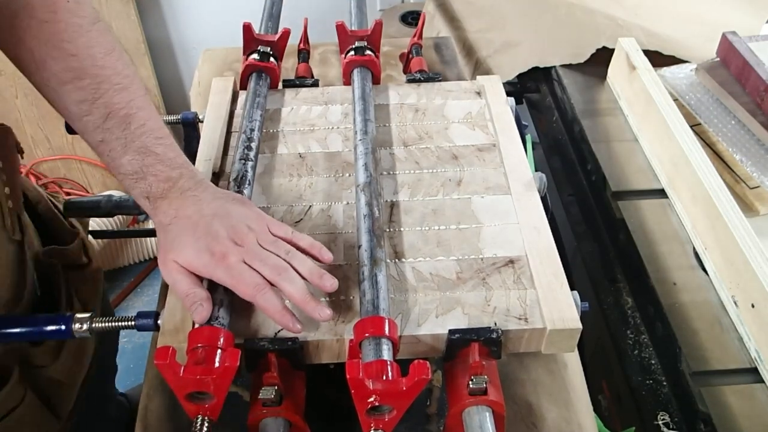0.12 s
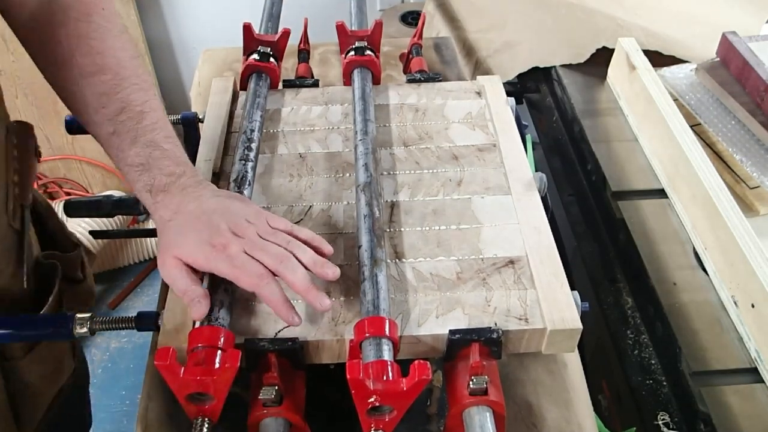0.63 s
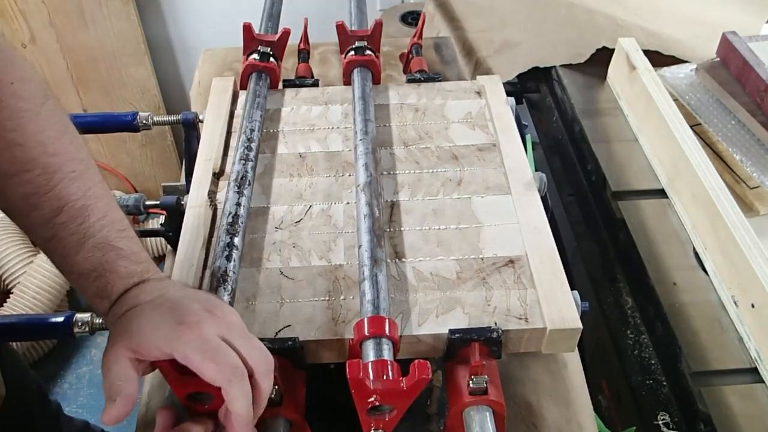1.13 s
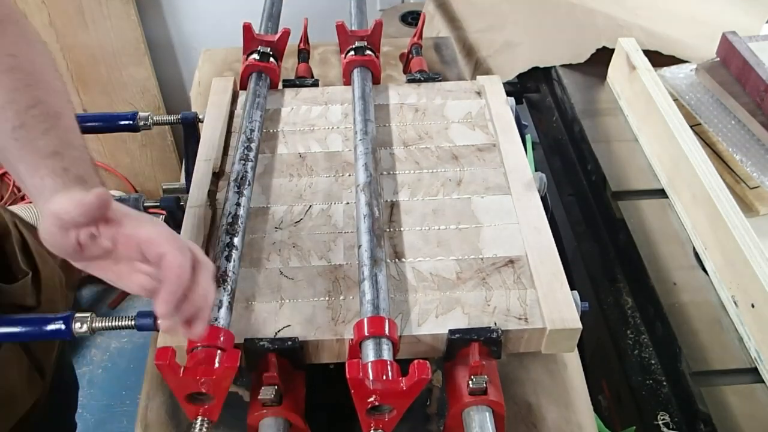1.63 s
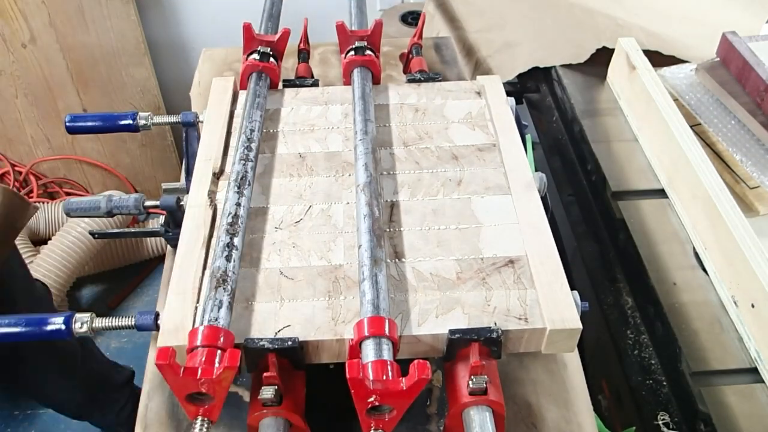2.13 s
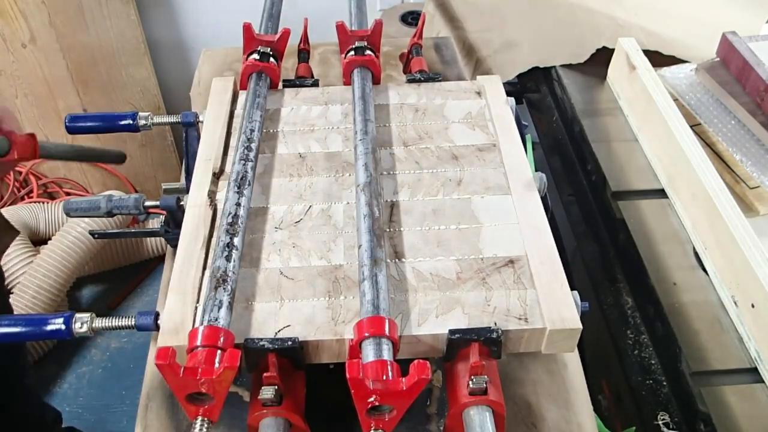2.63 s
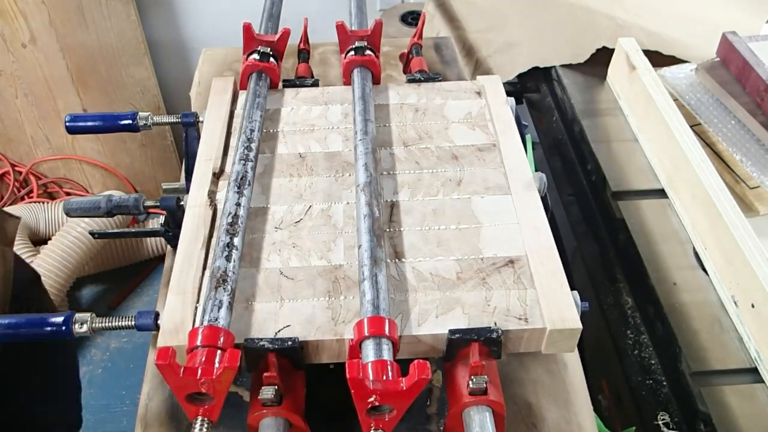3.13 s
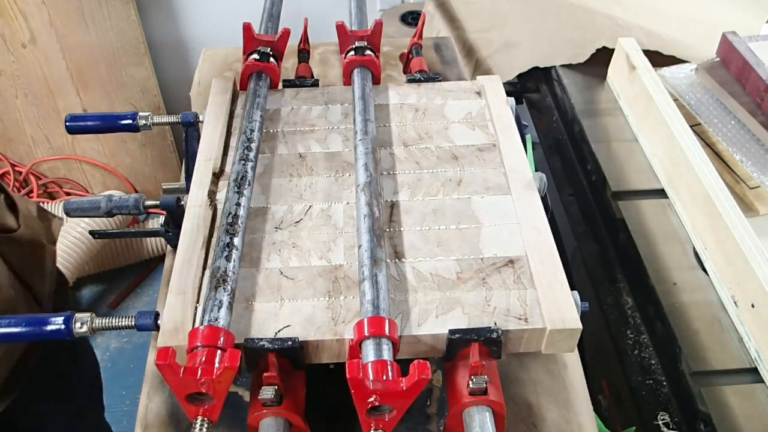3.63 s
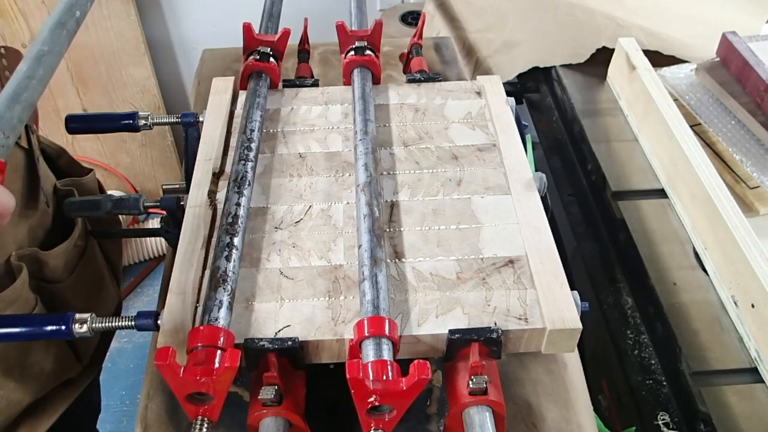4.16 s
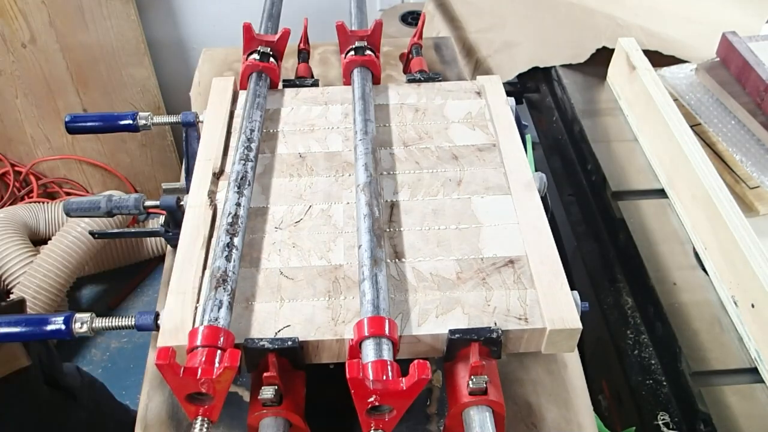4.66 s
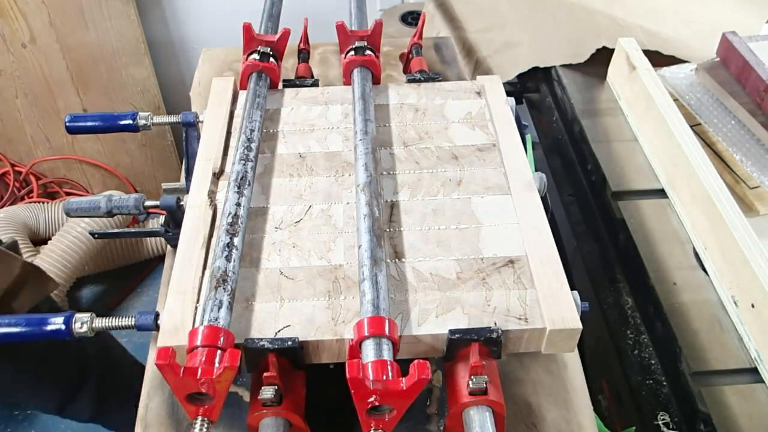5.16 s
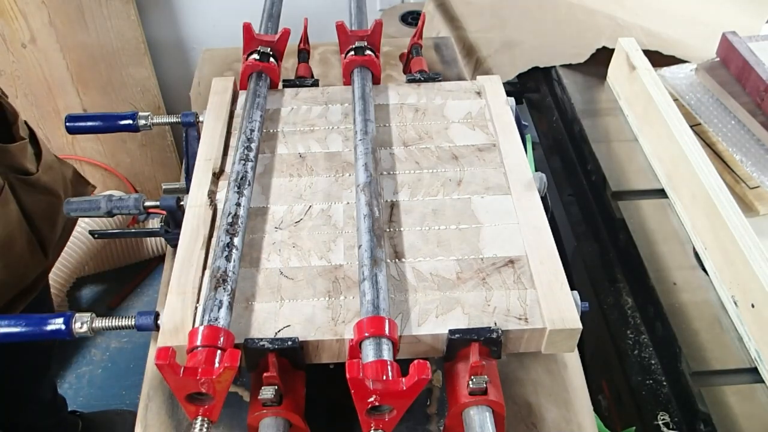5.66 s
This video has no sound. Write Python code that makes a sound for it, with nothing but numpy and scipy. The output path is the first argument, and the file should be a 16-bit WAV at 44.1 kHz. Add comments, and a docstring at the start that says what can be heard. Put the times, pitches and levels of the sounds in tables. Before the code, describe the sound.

Close stereo pickup in a quiet workshop: hands shift steel pipe clamps on a glued wooden panel, played fast. Light clanks, knocks and cloth or jaw scrapes begin, harder steel blows come past two and three seconds, then a dense clatter after four. One last hard clank near five leaves faint sliding over hiss tinged with a high whine.

```python
"""Hands tighten and shift steel pipe clamps on a wooden glue-up in a quiet workshop, played fast at its own pitch.
Light clanks, knocks and scrapes open it; harder blows follow past 2 s and 3.4 s, the densest from 4.2 to 4.8 s.
A last hard clank falls near 5.2 s, then sliding strokes fade over the room hiss. The speed-up blurs each blow into
a short burst, made of shaped noise and of modes whose phases differ left and right.
The microphone housing rings near 5 kHz and lends the hiss a high whine."""
import sys
import numpy as np
from scipy import signal
from scipy.fft import rfft, irfft, next_fast_len
from scipy.io import wavfile
from scipy.ndimage import uniform_filter1d

SR = 44100
rng = np.random.default_rng(int(sys.argv[2]) if len(sys.argv) > 2 else 0)


def gain_from_decibels(decibels):
    """Convert decibel values to linear amplitude factors."""
    exponent = np.asarray(decibels, float) / 20
    return 10 ** exponent


def digitize_waveform(pressure):
    """Quantize a signal to 16-bit integers and store it at the path in sys.argv[1].

    Rows of a 2-D input are taken as channels; values are limited to [-1, 1].
    """
    field = np.atleast_2d(pressure).T
    bounded = np.clip(field, -1, 1)
    quanta = np.round(bounded * 32767).astype(np.int16)
    wavfile.write(sys.argv[1], SR, quanta)


N = 254898  # samples


def read(points, hz):
    """Linear interpolation of a level curve on a log-frequency axis."""
    f, value = np.transpose(points)
    return np.interp(np.log(hz + 1), np.log(f + 1), value)


def evened(x):
    """Normalisation to unit root-mean-square."""
    return x / np.sqrt(np.mean(x ** 2))


def coloured(x, points):
    """Linear filtering: the spectrum is multiplied by a gain curve."""
    size = next_fast_len(N)
    gain = gain_from_decibels(read(points, np.fft.rfftfreq(size, 1 / SR)))
    return irfft(rfft(x, size) * gain, size)[..., :N]


def hiss(points):
    """Incoherent noise: filtered white noise, independent left and right."""
    return evened(coloured(rng.standard_normal((2, N)), points))


def lumps(smooth_s, depth_db):
    """Random amplitude modulation: smoothed noise read as a gain in dB, depth_db rms."""
    size = max(int(smooth_s * SR), 2)
    slow = uniform_filter1d(rng.standard_normal((2, N)), size)
    slow = uniform_filter1d(slow, size)
    return gain_from_decibels(depth_db * evened(slow))


def thicket(x, depth_db, wide, long):
    """Modal crowding: patches of the spectrum stand out for a moment, alike in both channels."""
    spectrum = signal.stft(x, nperseg=256, noverlap=192)[2]
    patches = rng.standard_normal(spectrum.shape[1:])
    patches = uniform_filter1d(patches, wide, axis=0)  # frequency bins
    patches = uniform_filter1d(patches, long, axis=1)  # frames of 64 samples
    lit = spectrum * gain_from_decibels(depth_db * evened(patches))
    return evened(signal.istft(lit, nperseg=256, noverlap=192)[1][:, :N])


def tone(hz, width_hz):
    """Phase diffusion: a mode is broadened by a phase that wanders on its own in each channel."""
    step = np.sqrt(2 * np.pi * abs(width_hz) / SR)
    phase = np.cumsum(rng.standard_normal((2, N)), axis=1) * step
    return np.sqrt(2) * np.sin(2 * np.pi * hz * np.arange(N) / SR + phase)


def bursts(s, db, length, peak, rise, tail_db, tail_s):
    """Energy envelope: the speed-up blurs each blow to a swell, a fall and a short room tail; powers add."""
    power = np.zeros(N + SR)
    before = SR // 20
    t = np.arange(-before, SR // 5) / SR
    for start, level_db, span in zip(s, db, np.clip(length, .002, .1)):
        u = t / span - peak  # time in spans
        steep = rise * gain_from_decibels(-.15 * (level_db + 35))  # harder blows start more abruptly
        swell = 2 / (np.exp(np.minimum(-u / steep, 600)) + np.exp(u / 0.48))
        tail = gain_from_decibels(tail_db) * np.exp(-t / tail_s) / (1 + np.exp(-u / rise))
        at = round(start * SR)
        power[at:at + len(t)] += gain_from_decibels(2 * level_db) * (swell ** 2 + tail ** 2)
    return np.sqrt(power[before:before + N])


def ringing(modes, s, db, hz, length, spread_db, width_hz, **shape):
    """Modal excitation: a blow drives most the modes near the pitch of the part it lands on."""
    rings = 0
    for mode_hz, mode_db in modes:
        octaves_off = abs(np.log2(mode_hz / hz))
        carrier = tone(mode_hz, width_hz)
        rings = rings + carrier * bursts(s, db + mode_db - spread_db * octaves_off, length, **shape)
    return rings


def strokes(middle_s, length_s, db):
    """Power summation: each stroke swells to its middle and fades, and overlapping powers add."""
    ends_db, pointed = -9, 1.56  # level at either end of a stroke; shape 1 = spike, 2 = bell
    t = np.arange(0, N + 64, 64) / SR
    away = abs(2 * (t - middle_s[:, None]) / length_s[:, None]) ** pointed
    power = gain_from_decibels(2 * np.maximum(db[:, None] + ends_db * away, -200)).sum(0)
    return np.sqrt(np.interp(np.arange(N) / SR, t, power))


# noise spectrum of the air and microphone: pitch_hz [Hz], density_db [dB per Hz, relative]
AIR_SPECTRUM = [(20, -11), (50, -7), (120, 4), (250, 3), (500, 0), (1000, -7), (2000, -11), (4000, -18.5),
                (8000, -20), (16000, -17.5)]


def air():
    """Stationary background noise: still workshop air and microphone hiss, flickering slightly."""
    return gain_from_decibels(-48.5) * hiss(AIR_SPECTRUM) * lumps(0.023, 0.91)


# sleeves brush and jaws slide; levels before the layer trims:
# middle_s [s], length_s [s], rub_db [dB], body_db [dB against rub], fizz_db [dB against rub]
STROKE_EVENTS = [(.01, 0.057, -56, -5, -5), (0.124, 0.072, -54, 2, -10), (0.186, 0.035, -41, -6, -13),
                 (0.253, 0.055, -50, -4, -17), (0.327, .04, -45, -16, -10), (0.362, 0.098, -38.5, -4, -10),
                 (0.51, 0.11, -50.5, -0.5, -18), (0.627, 0.048, -50, 0, -18), (0.715, 0.08, -46.5, -2, -15),
                 (0.805, 0.023, -47.5, 1, -10), (0.967, 0.022, -58.5, 13, -13), (1.1, 0.077, -52, -4, -9),
                 (1.196, 0.042, -37.5, -0.5, -11), (1.218, .06, -39, -4, -6.5),
                 (1.286, 0.032, -45.5, 1.5, -9), (1.376, 0.04, -52, 2, -12),
                 (1.454, 0.077, -40.5, -7.5, -12.5), (1.528, 0.096, -44.5, -5.5, -12),
                 (1.826, 0.051, -49.5, -1.5, -18), (1.907, 0.051, -48, -6, -21), (1.996, 0.12, -51, 3, -19),
                 (2.08, 0.038, -44.5, 4.5, -19), (2.128, 0.048, -41.5, -1.5, -19),
                 (2.172, 0.082, -34.5, -3, -18), (2.233, 0.051, -47.5, 0.5, -13),
                 (2.752, 0.093, -42.5, -9.5, -15), (2.911, .04, -45.5, -9, -5.5),
                 (2.997, 0.077, -45, -5.5, -8), (3.084, 0.045, -50, -5, -12),
                 (3.314, 0.067, -38.5, -14, -12), (3.543, 0.064, -49, 0, -25), (3.464, .04, -52, -5, -25),
                 (3.626, 0.037, -56, -6, -10), (3.8, 0.068, -47, -6, -21), (3.972, 0.034, -46.5, -6, -10),
                 (4.09, 0.051, -43.5, -10, -13), (4.143, 0.055, -47, -4, -17),
                 (4.214, 0.084, -45, -2.5, -11), (4.33, 0.038, -41, 4, -15), (4.535, 0.093, -45.5, -2, -24),
                 (4.658, 0.1, -48.5, 1, -14), (4.735, 0.12, -42.5, 1, -17), (4.87, 0.073, -46.5, -3.5, -11),
                 (4.932, 0.034, -48, -5, -14), (5.1, 0.1, -47.5, -19, -6.5), (5.267, 0.1, -45, -9.5, -8.5),
                 (5.689, 0.057, -46, -9.5, -8.5), (5.743, 0.044, -48, -14, -10)]
# spectrum of the rub, and of the bite of a clank: pitch_hz [Hz], density_db [dB per Hz, relative]
BITE_SPECTRUM = [(1500, -60), (3000, -8), (3800, 6.5), (5000, 3.5), (6500, -7.5), (8000, -26)]
# low spectrum of sliding: pitch_hz [Hz], density_db [dB per Hz, relative]
RUB_BODY_SPECTRUM = [(100, -50), (300, 7), (700, 4.5), (2000, 0), (3500, 1), (4200, -16.5)]
# high spectrum of sliding: pitch_hz [Hz], density_db [dB per Hz, relative]
FIZZ_SPECTRUM = [(3000, -60), (5500, 3.5), (7000, -5), (9000, -5.5), (11000, 2), (13000, -3), (16000, -11)]


def scrape():
    """Friction noise: the grainy contact of cloth and of jaws sliding on pipe, over a random stirring of cloth."""
    middle_s, length_s, rub_db, body_db, fizz_db = np.transpose(STROKE_EVENTS)
    stir = gain_from_decibels(-65.5) * lumps(0.027, 5.5)[0]
    rub_level = np.hypot(strokes(middle_s, length_s, rub_db), stir)
    body_level = np.hypot(strokes(middle_s, length_s, rub_db + body_db), gain_from_decibels(3.0) * stir)
    fizz_level = np.hypot(strokes(middle_s, length_s, rub_db + fizz_db), gain_from_decibels(-3) * stir)
    rub = gain_from_decibels(-7.5) * hiss(BITE_SPECTRUM) * rub_level
    body = gain_from_decibels(0.5) * thicket(hiss(RUB_BODY_SPECTRUM), 2.2, wide=3, long=16) * body_level
    fizz = hiss(FIZZ_SPECTRUM) * fizz_level
    grain = lumps(0.0094, 1.47)[0]
    return (rub + body + fizz) * grain


# knocks on the wood; levels before the layer trims:
# start_s [s], level_db [dB], pitch_hz [Hz], bench_db [dB against level], length_s [s]
KNOCK_EVENTS = [(0.119, -39, 240, -30, .012), (0.155, -29, 388, -40, 0.017), (0.217, -33, 270, -8.5, 0.014),
                (0.235, -31.5, 110, -33, 0.029), (0.598, -28, 264, -34, 0.012),
                (0.693, -39.5, 300, -31, 0.012), (0.715, -41.5, 600, -31, .012),
                (0.958, -40.5, 360, -23, 0.014), (1.02, -27, 681, -50, 0.011),
                (1.06, -40.5, 460, -25, 0.011), (1.17, -27.5, 175, -21, 0.0074),
                (1.663, -28.5, 360, -25, 0.009), (1.685, -30, 530, -32, 0.015),
                (1.708, -27, 605, -26, 0.0066), (2.422, -39.5, 826, -24, 0.014),
                (3.522, -33, 335, -26, 0.041), (3.555, -41, 330, -18, 0.047),
                (4.288, -26.5, 354, -28, 0.027), (4.319, -16.5, 361, -40, 0.012),
                (4.329, -20, 325, -44, 0.015), (4.378, -37, 430, -30, 0.01), (4.4, -29, 252, -28, 0.017),
                (4.436, -25, 463, -42, 0.016), (4.441, -30.5, 232, -35, 0.024),
                (4.494, -26, 266, -48, 0.024), (4.765, -30, 294, -25, 0.024), (4.77, -33, 226, -29, 0.013),
                (4.804, -37.5, 604, -30, .012), (4.85, -30.5, 394, -23, 0.013)]
# modes of the boards: pitch_hz [Hz], level_db [dB, relative]
WOOD_MODES = [(110, -4), (175, 2.3), (238, 0.5), (334, -0.5), (430, -1), (550, 2.3), (680, -4), (760, -10)]
# spectrum of the dull puff: pitch_hz [Hz], density_db [dB per Hz, relative]
PUFF_SPECTRUM = [(20, -50), (50, -39), (120, -11), (300, 0), (700, -3), (1400, -11.5), (2500, -25),
                 (5000, -60)]


def knocks():
    """Impact on a panel: board modes, a dull puff, and a low bench thump near 72 Hz set for each knock."""
    s, db, hz, bench_db, length = np.transpose(KNOCK_EVENTS)
    shape = dict(peak=0.36, rise=0.21, tail_db=-11.0, tail_s=0.016)
    boards = gain_from_decibels(-6.0) * ringing(WOOD_MODES, s, db, hz, length, spread_db=15.0, width_hz=10.17, **shape)
    puff_db = db + 4.5 * np.log2(hz / 350)  # low knocks puff less, 4.5 dB per octave
    puff = gain_from_decibels(-5) * hiss(PUFF_SPECTRUM) * bursts(s, puff_db, 0.57 * length, **shape)
    bench = gain_from_decibels(6) * tone(71.8, 7.7) * bursts(s, db + bench_db, 0.71 * length, **shape)
    return boards + puff + bench


# plates and handles set singing: start_s [s], level_db [dB], pitch_hz [Hz, part struck], length_s [s]
PING_EVENTS = [(0.292, -45, 2400, .012), (1.174, -46, 5800, .02), (1.755, -31.5, 1820, 0.0095),
               (1.756, -43.5, 5160, 0.014), (1.797, -43, 1820, 0.025), (1.867, -59.5, 2860, 0.1),
               (2.087, -36, 6440, 0.018), (2.09, -51, 10700, .018), (3.026, -36, 1980, 0.0087),
               (3.205, -35, 2860, 0.011), (4.298, -52, 15300, .013), (4.411, -49, 9400, .016),
               (4.432, -33, 15300, .016), (4.433, -23.5, 5800, 0.0081), (4.446, -46, 9900, .012),
               (4.496, -23, 13040, .009), (4.493, -31, 14600, .011), (4.497, -40, 10400, .015),
               (4.525, -55, 2860, .06), (4.774, -39, 7940, 0.019)]
# modes of the loose clutch plates and handles: pitch_hz [Hz], level_db [dB, relative]
PLATE_MODES = [(1820, 3), (1980, 2.5), (2400, 0), (2860, -2), (5160, -2.5), (5800, 0), (6440, 0), (7940, 0),
               (9400, 0), (10400, 2), (12800, 2.5), (13400, 0), (14600, 0), (15300, 0)]


def pings():
    """Lightly damped resonance: small loose parts sing on one or two clear notes."""
    s, db, hz, length = np.transpose(PING_EVENTS)
    shape = dict(peak=0.16, rise=0.16, tail_db=-34, tail_s=.02)
    return ringing(PLATE_MODES, s, db, hz, length, spread_db=130, width_hz=7.4, **shape)


# steel on steel; levels before the layer trims:
# start_s [s], level_db [dB], body_db [dB against level], sizzle_db [dB against level], pitch_hz [Hz]
CLANK_EVENTS = [(0.142, -25, -20, -23.5, 2020), (0.155, -35, -2, -29.5, 2320),
                (0.2716, -30, -16, -19, 3350), (0.293, -23, -12, -18.5, 2350),
                (0.3816, -27, -18, -26, 2270), (0.5511, -20, -13, -27.5, 1020),
                (0.599, -28.5, -20, -28, 1690), (0.7482, -23, -16.5, -21.5, 3200),
                (0.781, -30, -18, -18.5, 2760), (0.843, -33.5, -8, -26, 2520), (1.02, -20, -6.5, -30, 1250),
                (1.176, -32.5, -3, -19, 2970), (1.282, -33.5, -6, -15, 1580),
                (1.378, -32, -11, -22.5, 1020), (1.6584, -27.5, -12.5, -25, 2320),
                (1.6674, -19, -15.5, -27, 1120), (1.71, -17, -9, -25.5, 2360),
                (1.756, -32.5, -6.5, -26, 1820), (1.7981, -19, -16, -29.5, 3470),
                (2.0307, -21, -12.5, -27.5, 2060), (2.084, -19.5, -7.5, -20, 2000),
                (2.093, -18.5, -13, -21, 1520), (2.1015, -13.5, -11, -25.5, 2180),
                (2.411, -39, -5, -31, 1330), (2.429, -27.5, -5.5, -22, 1340), (2.44, -15.5, -8, -23, 1300),
                (2.5142, -19, -13, -31, 1990), (2.781, -33, -11, -16.5, 3030),
                (3.025, -27.5, -6, -25, 1950), (3.1232, -24, -10.5, -33, 3320),
                (3.1997, -22, -8, -29, 2760), (3.219, -30.5, -17, -17.5, 2810),
                (3.37, -18.5, -15.5, -21, 2900), (3.404, -9.5, -18, -31.5, 3330),
                (3.418, -26, -22, -32, 3480), (3.448, -31, -25, -23, 2440), (3.5198, -30, -17, -27, 1290),
                (3.713, -28, -23, -31, 2320), (3.7344, -29.5, -26, -27, 2770),
                (3.7445, -32, -13, -32, 2440), (3.7606, -30.5, -16, -28, 2600),
                (3.836, -22, -14.5, -22, 2460), (3.872, -24, -20, -25, 1780), (3.91, -36.5, -22, -21, 2480),
                (4.0252, -29.5, -17, -13, 1610), (4.066, -33, -18, -17, 1970),
                (4.208, -14.5, -15.5, -27.5, 1290), (4.291, -7.5, -9.5, -23.5, 1985),
                (4.304, -21, -16, -20, 1350), (4.3194, -16, -4.5, -23.5, 1140),
                (4.337, -29, -11, -21, 1350), (4.4055, -23, -9, -22, 3060), (4.412, -18.5, -11, -25, 2430),
                (4.4342, -8.5, -15.5, -21.5, 1060), (4.441, -8.5, -14.5, -22, 2200),
                (4.459, -11.5, -21.5, -25.5, 3750), (4.494, -13.5, -19, -18.5, 2500),
                (4.502, -13.5, -10, -25.5, 2470), (4.47, -24, -15, -32, 3600),
                (4.6704, -27.5, -6.5, -28, 1640), (4.739, -27, -8.5, -22, 2770),
                (4.7592, -14, -6.5, -22, 1820), (4.779, -11, -10.5, -18, 2340),
                (4.79, -20, -14, -18.5, 2000), (4.8176, -27.5, -7, -16, 1780), (4.8524, -41, 4, -32, 1210),
                (4.933, -36, -17, -23, 2700), (5.1678, -18, -14, -27, 3020), (5.1735, -9, -18, -23.5, 3570)]
# modes of the clamp steel: pitch_hz [Hz], level_db [dB, relative]
STEEL_MODES = [(1140, -6), (1350, -7), (1590, -9), (1814, -7.5), (1980, -5.5), (2190, -7.5), (2430, -8),
               (2770, -2), (3000, -6), (3460, -1.5), (3620, 1.5)]
# low contact spectrum: pitch_hz [Hz], density_db [dB per Hz, relative]
BODY_SPECTRUM = [(250, -60), (500, -4.5), (1000, -1.5), (2000, 3), (3500, 1), (4200, -18), (7000, -55)]
# high contact spectrum: pitch_hz [Hz], density_db [dB per Hz, relative]
SIZZLE_SPECTRUM = [(3000, -62), (5500, 11), (7000, 4), (10000, 5), (13000, 3.5), (16000, -19)]


def clanks():
    """Impact of steel on steel: rattling contact noise in three ranges plus the rings of the clamp steel."""
    s, db, body_db, sizzle_db, hz = np.transpose(CLANK_EVENTS)
    # a blow that grinds sizzles more, lasts longer and rings less than a clean one
    grind_db = sizzle_db + 25.5
    length = 0.012 * np.exp(0.0534 * grind_db)  # s
    ring_db = -0.5 - 0.4 * grind_db
    shape = dict(peak=0.2, rise=0.21, tail_db=-26.0, tail_s=0.031)
    bite_noise = thicket(hiss(BITE_SPECTRUM), 4.15, wide=2, long=10)
    body_noise = thicket(hiss(BODY_SPECTRUM), 4.0, wide=2, long=10)
    sizzle_noise = thicket(hiss(SIZZLE_SPECTRUM), 2.5, wide=3, long=12)
    bite = gain_from_decibels(-14.5) * bite_noise * bursts(s, db, length, **shape)
    body = gain_from_decibels(-3.5) * body_noise * bursts(s, db + body_db, length, **shape)
    sizzle = gain_from_decibels(-1.0) * sizzle_noise * bursts(s, db + sizzle_db, length, **shape)
    chatter = lumps(0.00086, 2.0)  # parts bounce several times within one clank
    rings = gain_from_decibels(2.5) * ringing(STEEL_MODES, s, db + body_db + ring_db, hz, 0.83 * length,
                               spread_db=49, width_hz=19.55, **shape)
    return (bite + body + sizzle) * chatter + rings


def scene():
    """Superposition: everything the hands do adds to the still air."""
    return clanks() + pings() + knocks() + scrape() + air()


# response of the microphone housing with its notch, and the upper band limit: pitch_hz [Hz], gain_db [dB]
HOUSING_RESPONSE = [(3000, -0.5), (3700, -2.5), (3950, -3), (4060, -10.5), (4180, -1), (4400, 7),
                    (4750, 10.5), (5250, 7), (5800, 1), (6600, 2), (15700, -3.5), (15950, -50)]


def housing(dry):
    """Resonance: the microphone housing lifts the band near 5 kHz above a narrow notch; the top is cut."""
    return coloured(dry, HOUSING_RESPONSE)


def low_pass(x):
    """Removes everything above the highest recorded frequency."""
    return signal.sosfilt(signal.butter(12, 16800, fs=SR, output="sos"), x)


def record(dry):
    """Linear pickup: the sound passes through the resonant microphone housing and the upper band limit."""
    mix = housing(dry)
    return low_pass(mix)


dry = scene()
out = record(dry)
digitize_waveform(out)
```